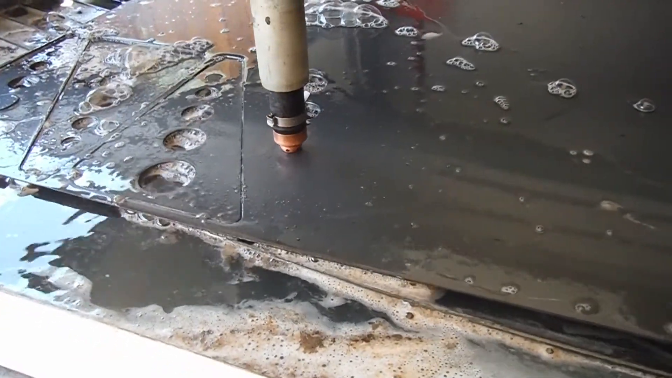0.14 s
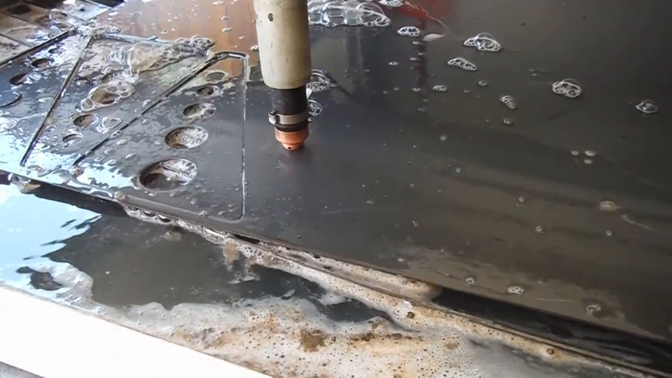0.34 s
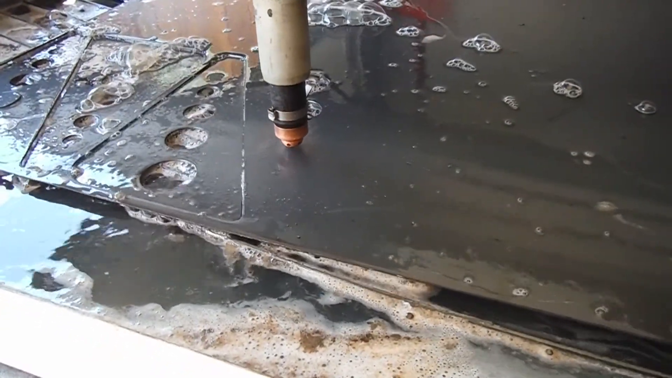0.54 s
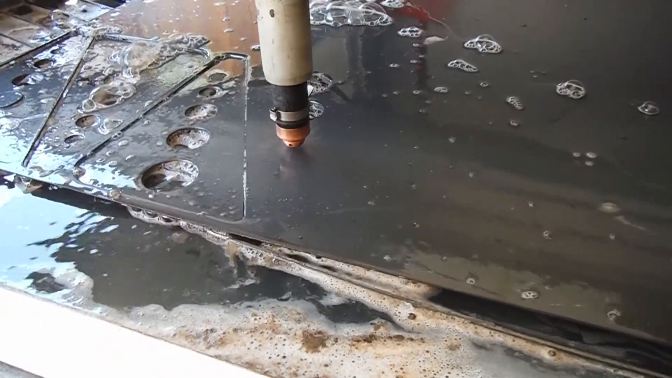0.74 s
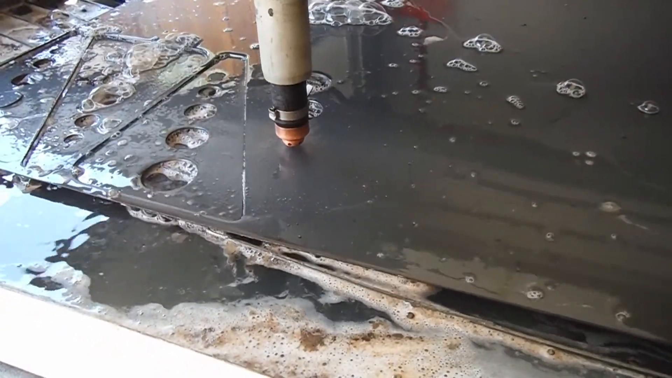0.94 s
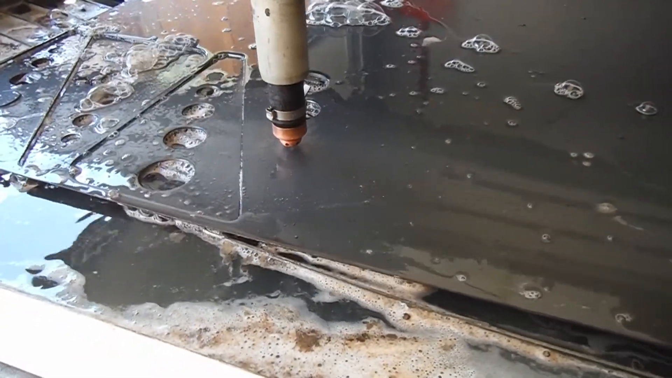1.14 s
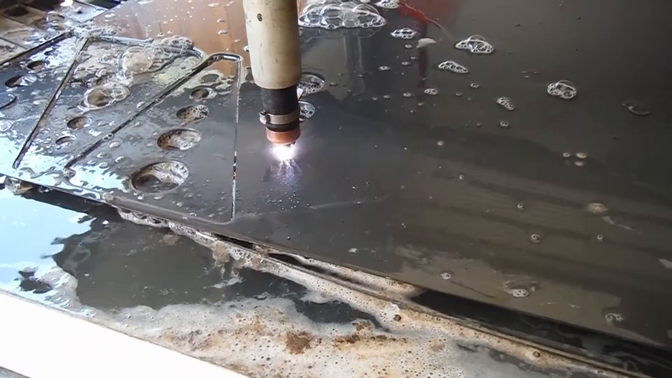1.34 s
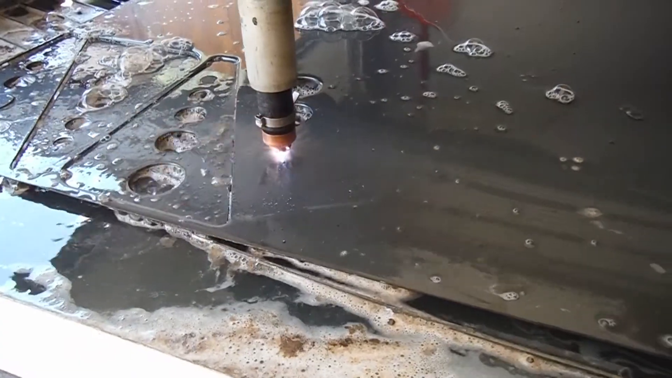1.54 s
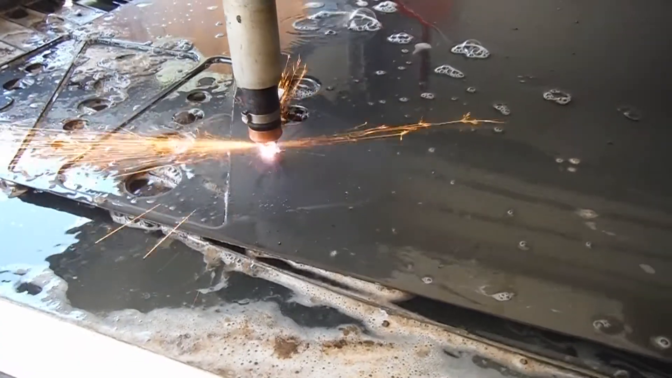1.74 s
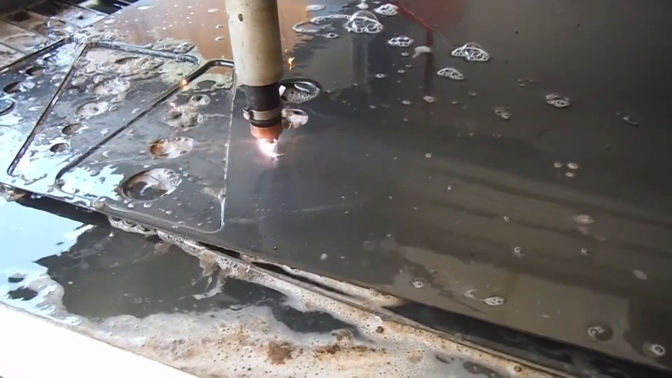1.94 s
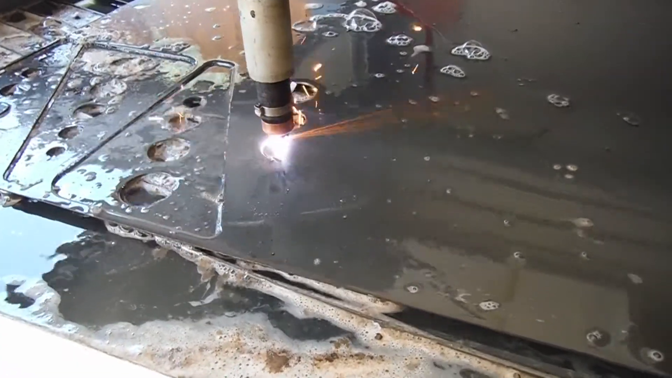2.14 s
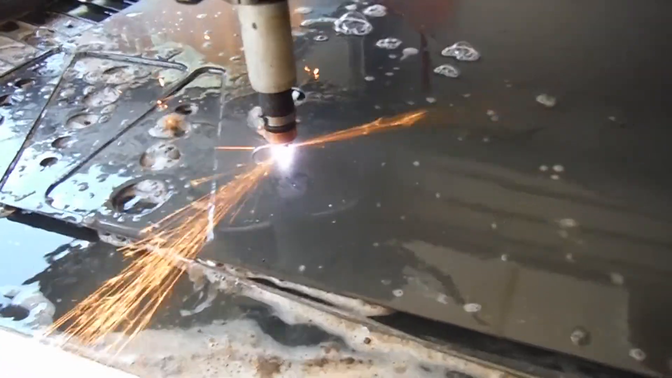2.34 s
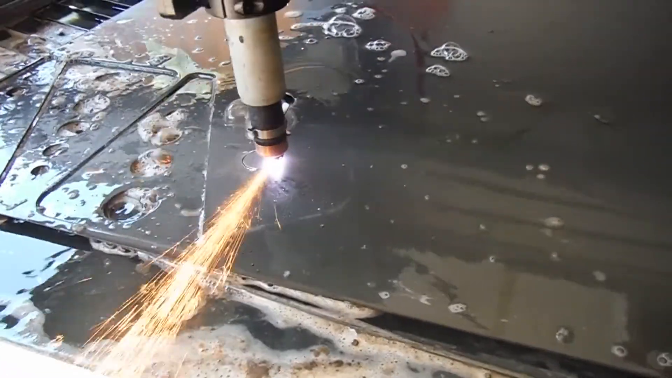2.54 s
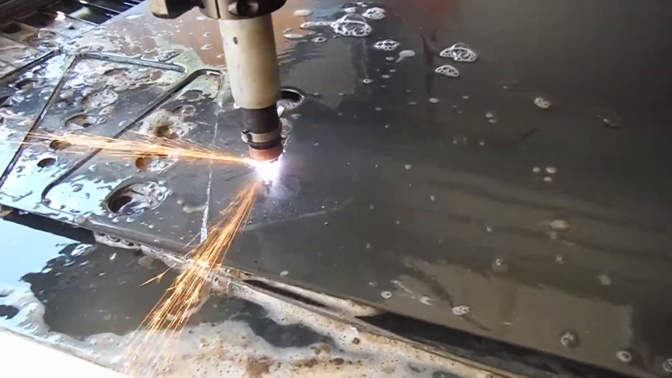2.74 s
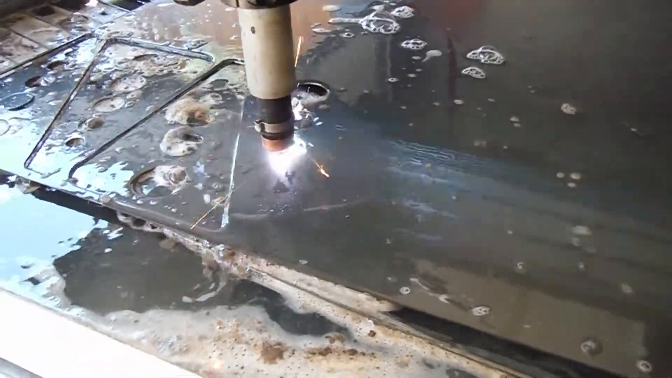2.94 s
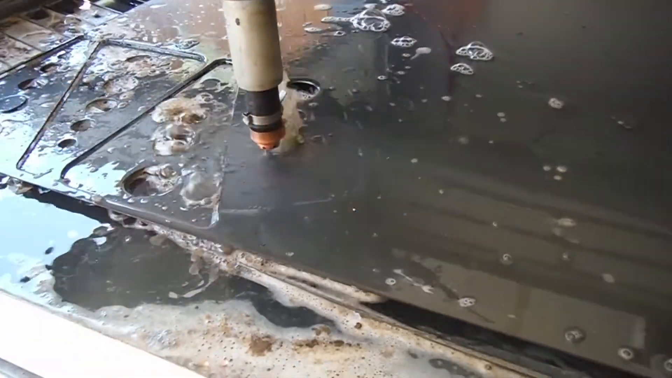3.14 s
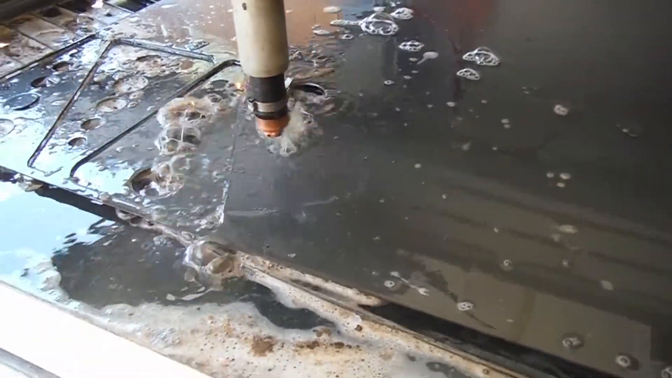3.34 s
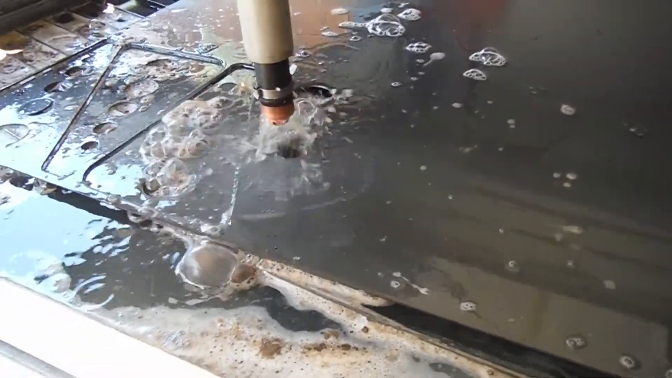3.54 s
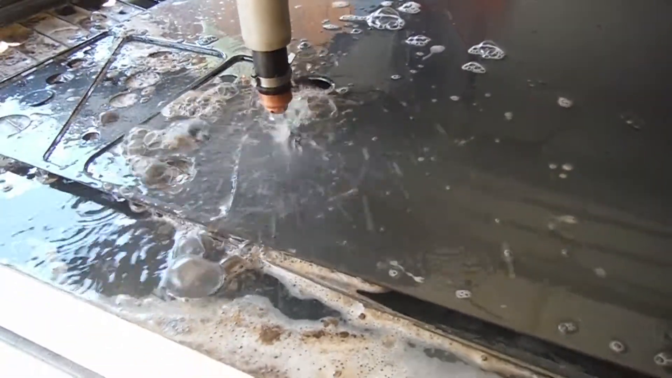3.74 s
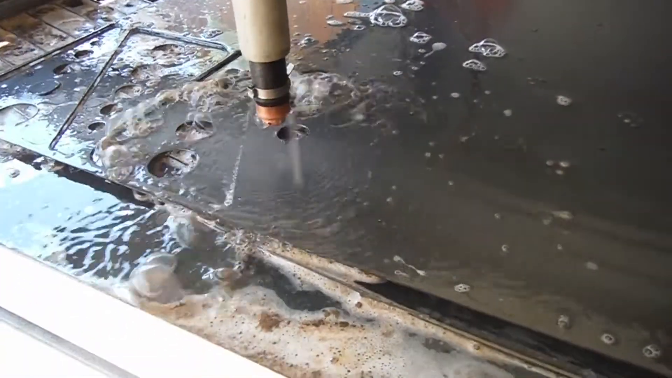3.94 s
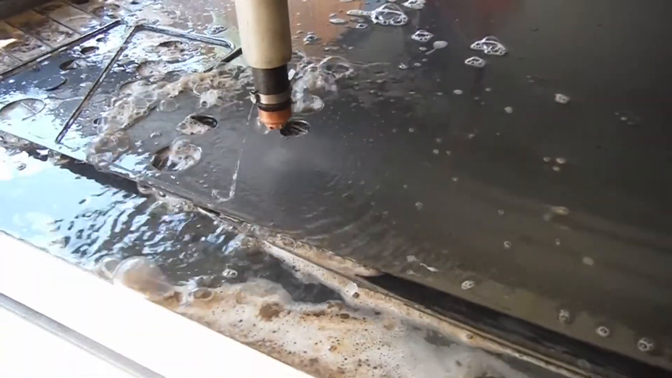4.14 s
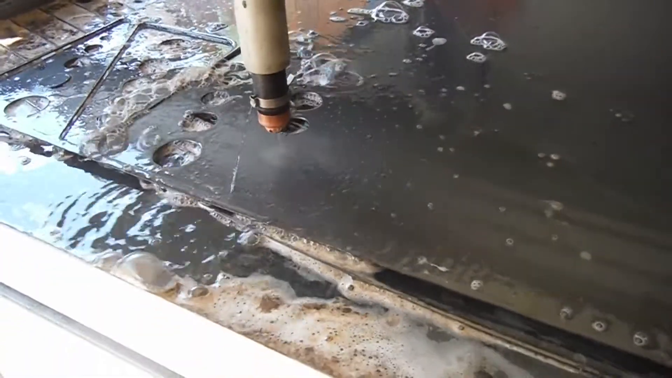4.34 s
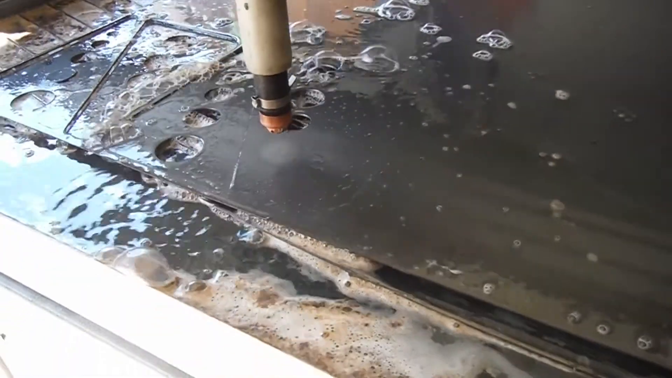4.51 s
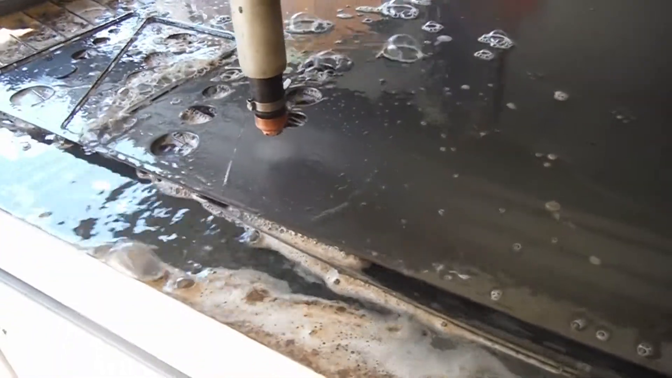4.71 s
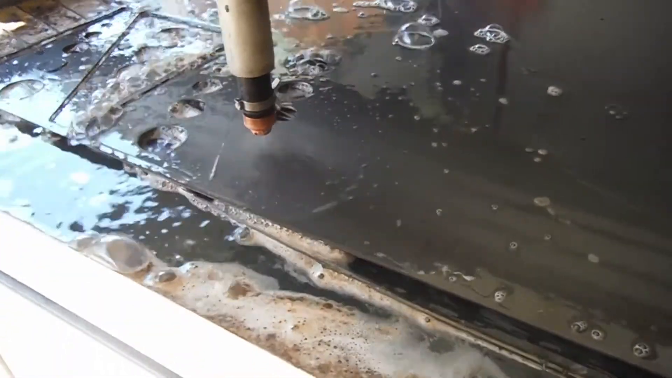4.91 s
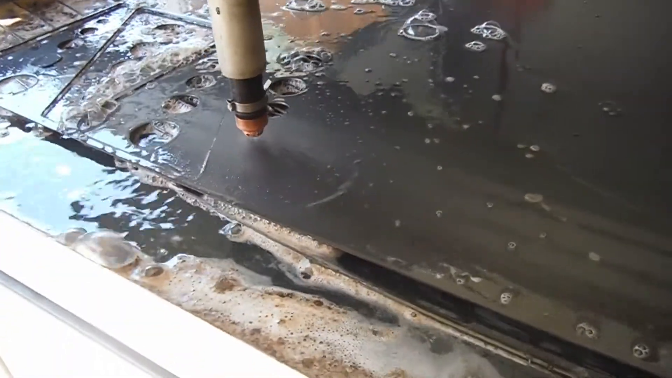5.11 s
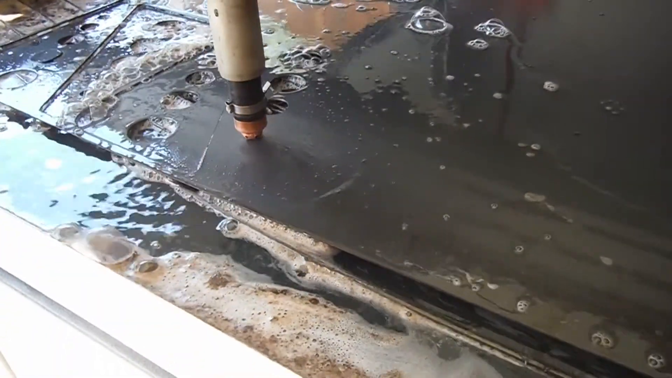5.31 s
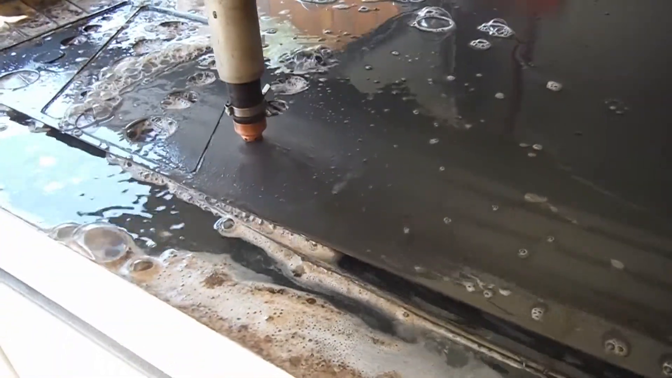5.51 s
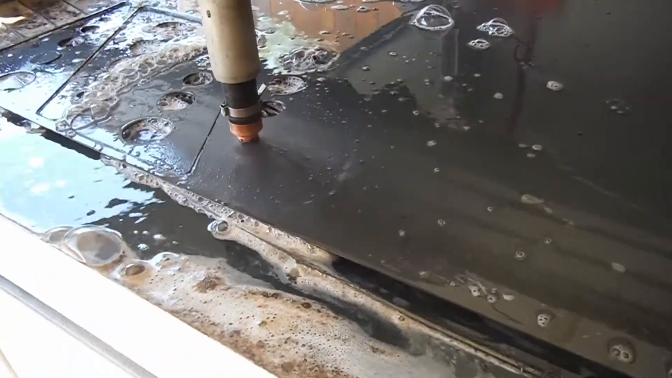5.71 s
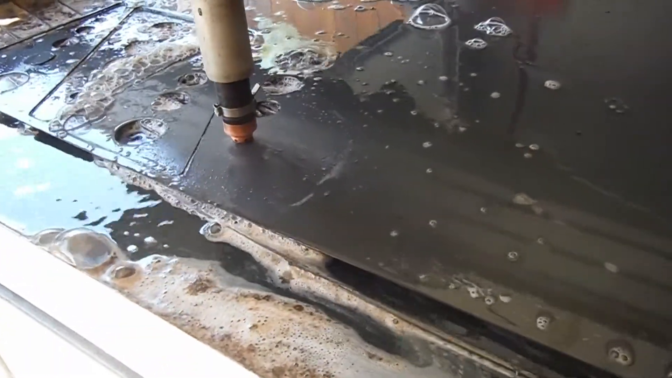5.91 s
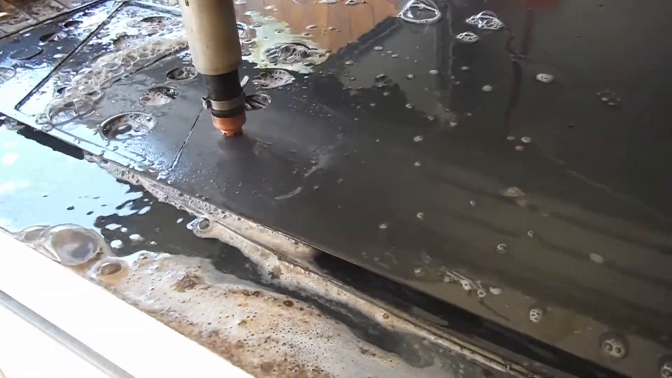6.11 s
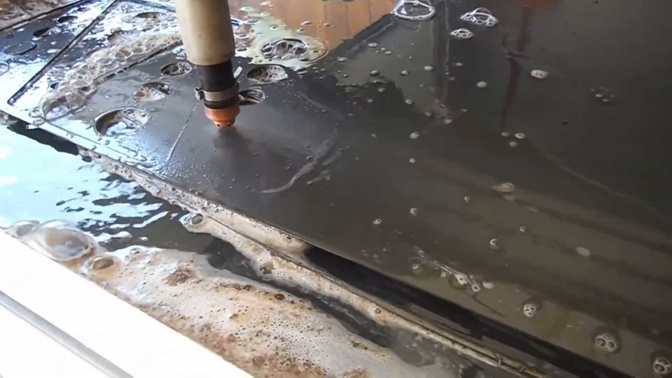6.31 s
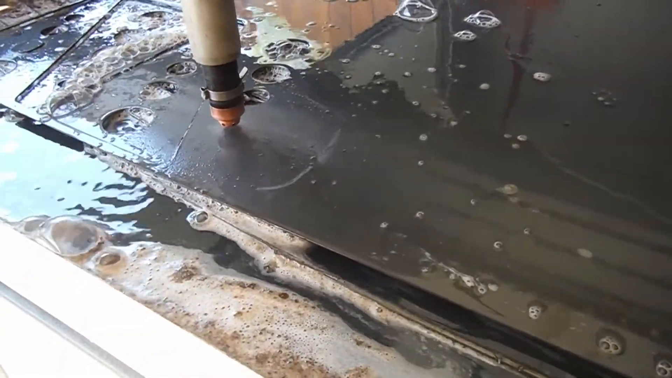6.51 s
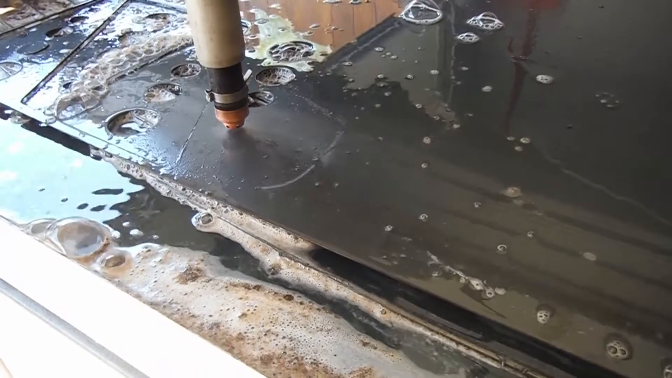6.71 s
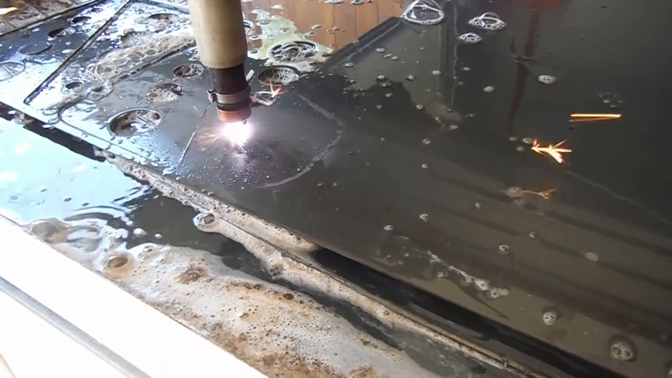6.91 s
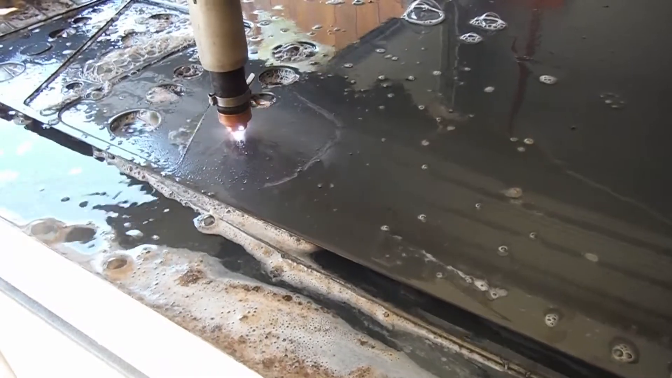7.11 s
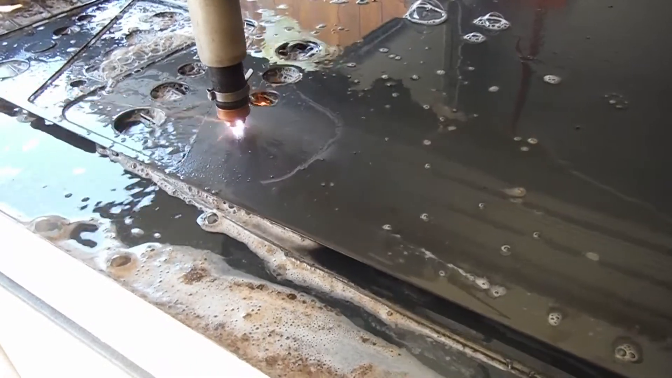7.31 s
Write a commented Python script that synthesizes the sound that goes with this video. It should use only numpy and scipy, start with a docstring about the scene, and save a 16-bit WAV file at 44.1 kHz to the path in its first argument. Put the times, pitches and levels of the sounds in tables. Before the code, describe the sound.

A harsh, bright air-jet hiss, very close and overloaded into hard clipping, runs steadily from the start. At about 0.75 s it drops away within a quarter second, baring faint workshop fans, hum and a thin motor whine. A sharp valve click at 1.17 s is followed at 1.2 s by the arc's pop; full hiss leaps back with a bright sizzle. Low burbles throb until 1.7 s, while a rough, puffing roar grows. Sizzling showers swell around 1.6-2.1 and 2.9 s, and wet, chirping spits ring from 2.2 s. The arc dies near 3.1 s; hiss carries on over churning bubbles and longer watery spits until about 3.9 s. Its tone drops, then climbs back, half whistling, through 5.5 s. It fades at 6.4 s to quiet motor whine. A click at 6.84 s and thumping strike at 6.87 s restart hiss, burble and sizzle to the end at about 7.4 s.

```python
"""A harsh, overloaded air-jet hiss close by: a plasma torch over sheet steel on a water table.
The hiss dies away twice and returns with a valve click and the pop of the arc striking.
Low burbles pierce the plate, shaped noise roars and sizzles in the cut, and ringing spits chirp in the water.
The jet is filtered noise whose colour shifts as the torch lifts; faint fans, hum and motors lie behind.
The summed sound is clipped hard and its top is cut."""
import sys
import numpy as np
from scipy import signal
from scipy.fft import rfft, irfft, next_fast_len
from scipy.io import wavfile

SR = 44100
rng = np.random.default_rng(int(sys.argv[2]) if len(sys.argv) > 2 else 0)


def to_wav(s):
    """Save 16-bit WAV."""
    ch = np.atleast_2d(s).T  # columns
    pcm = np.round(np.clip(ch, -1, 1) * 32767)  # PCM
    wavfile.write(sys.argv[1], SR, pcm.astype(np.int16))


N = 324576
WINDOW, HOP = 512, 256  # short-time spectrum, samples
TIME = np.arange(N) / SR
FRAMES = np.arange(-(-N // HOP) + 1) * HOP / SR  # s
BINS = np.maximum(np.arange(WINDOW // 2 + 1), .5)[:, None] * SR / WINDOW  # Hz


def from_db(db):
    """Amplitude of a level in dB."""
    return 10 ** (np.asarray(db) / 20)


def rms_one(x):
    """Scales a sound to rms 1."""
    return x / np.sqrt(np.mean(x ** 2) + 1e-20)


def columns(rows, times):
    """Each column of a curve, read at the given times."""
    s, *values = np.transpose(rows)
    return [np.interp(times, s, v) for v in values]


def at_hz(points, hz):
    """A spectrum read on a log-frequency axis."""
    point_hz, point_db = np.array(points).T
    return np.interp(np.log(hz), np.log(point_hz), point_db)


def drift(rate):
    """Smooth chance of spread 1 that changes about `rate` times a second."""
    # low-passed noise, drawn at every 20th sample
    r = np.exp(-40 * np.pi * rate / SR)
    noise = rng.standard_normal(N // 20 + 2002)
    slow = signal.lfilter([1], [1, -2 * r, r * r], noise)[2000:]
    return np.interp(np.arange(N) / 20, np.arange(len(slow)), rms_one(slow))


def turbulence(spectrum, flutter_db, flutter_rate):
    """Noise that comes in quick puffs, coloured by a spectrum; rms 1."""
    flutter = np.clip(drift(flutter_rate), -2.5, 2.5)
    puffs = rng.standard_normal(N) * from_db(flutter_db * flutter)
    size = next_fast_len(N)
    hz = np.maximum(np.arange(size // 2 + 1) * SR / size, 1)
    coloured = rfft(puffs, size) * from_db(at_hz(spectrum, hz))
    return rms_one(irfft(coloured, size)[:N])


def bell(centre_hz, octaves):
    """A bell on the log-frequency axis, one for each frame."""
    return np.exp(-.5 * (np.log2(BINS / centre_hz) / octaves) ** 2)


def gate(times, start, end, fade_s):
    """Rises from start, holds at 1, and has fallen again by end."""
    return np.clip(np.minimum(times - start, end - times) / fade_s, 0, 1)


def add(out, s, sound):
    """Mixes a sound in at time s."""
    start = round(s * SR)
    out[start:start + len(sound)] += sound[:N - start]


# colour of the jet; the low edge drops as the torch lifts:
# (time [s], low edge [Hz], boost of the 13 kHz hump [dB, before levelling])
TORCH_COLOUR = [(0, 3670, 2.5), (1.3, 3694, 0.5), (2.8, 3835, 3), (3.15, 3720, -1), (3.5, 3030, -5.5),
                (3.8, 2830, -4.5), (4.26, 3067, -2), (4.95, 3470, -3), (5.55, 4060, -0.5),
                (7.36, 3900, -1.5)]
RESTING_EDGE_HZ = 4000


def lift_of(times):
    """How far the torch is lifted, in octaves that the jet's low edge has dropped."""
    edge_hz = columns(TORCH_COLOUR, times)[0]
    return np.clip(np.log2(RESTING_EDGE_HZ / edge_hz), 0, None)


# the valve shuts and the hose empties, ever faster: (time [s])
VALVE_SHUTS = [0.76, 6.431]
# the air valve opens with a click before each cut: (time [s], click peak [dB])
VALVE_OPENS = [(1.167, -6), (6.839, -6)]
# the arc burns: (strike [s], out [s], thump [dB], ring [Hz], ring level [dB])
ARCS = [(1.2005, 3.12, -23, 2000, -17), (6.872, 7.5, -8.5, 1280, -9.5)]
EMPTY_S, EMPTY_DB, EMPTY_CURVE = .25, 30, 1.43  # the jet loses this much in this time
PREFLOW_DB, PREFLOW_DB_PER_S = -23.5, 300  # the air builds up between click and strike


def flow_db(times):
    """Air flow against full: dies when the valve shuts, builds after the click, leaps to full at the strike."""
    db = np.zeros(len(times))
    for shut, (opened, _), (strike, *_) in zip(VALVE_SHUTS, VALVE_OPENS, ARCS):
        shut_for = np.maximum(times - shut, 0)
        emptying = -np.minimum(EMPTY_DB * (shut_for / EMPTY_S) ** EMPTY_CURVE, 42)
        building = PREFLOW_DB + PREFLOW_DB_PER_S * (times - opened)
        db += np.where(times < opened, emptying, building) * (times < strike)
    return db


# fan noise spectrum: (frequency [Hz], relative density [dB])
SHOP_SPECTRUM = [(25, -13), (45, -12), (70, -2), (100, -11), (180, -9.5), (330, -7), (600, -17), (900, -13),
                 (1900, -22), (3500, -20), (6000, -32), (15000, -65)]
# hum of the workshop's machines: (frequency [Hz], mean level [dB])
HUM = [(66.5, -51.5), (83.3, -54.5), (121, -56.5), (167, -56), (247.5, -55)]
# drive motors lowering the torch: (start [s], end [s], frequency [Hz], level [dB])
MOTORS = [(.76, 1.184, 899, -54.5), (.85, 1.1, 1180, -58), (6.444, 6.88, 430, -53), (6.5, 6.87, 1140, -61),
          (6.55, 6.87, 1320, -61)]


def workshop(floor_db=-46.0, waver_db=2.5):
    """Broad fan noise, wavering sine hums and the short, slightly unsteady whine of the drive motors."""
    out = from_db(floor_db) * turbulence(SHOP_SPECTRUM, flutter_db=0.5, flutter_rate=7.4)
    # the root of two turns an rms level into a sine's peak
    for hz, level_db in HUM:
        level = np.sqrt(2) * from_db(level_db + waver_db * drift(7.1))
        out += level * np.sin(2 * np.pi * (hz * TIME + rng.random()))
    for start, end, hz, level_db in MOTORS:
        running = gate(TIME, start, end, fade_s=.034)
        whine = np.sin(2 * np.pi * hz * TIME + 0.34 * drift(17))
        out += np.sqrt(2) * from_db(level_db) * running * whine
    return out


CLICK_HZ, CLICK_RING_S, CLICK_BODY_DB = 7400, .00035, -3  # the valve's ring and the dull knock under it


def ignition(click_s=0.0004, thump_hz=62, thump_s=0.0059, ring_s=.011, crack_db=-11.5, crack_s=0.013):
    """The valve clicks; then the arc strikes, and the suddenly heated air thumps and rings under the torch."""
    out, t = np.zeros(N), TIME[:SR // 8]
    for s, peak_db in VALVE_OPENS:
        knock = rng.standard_normal(len(t)) * np.exp(-t / click_s)
        knock = signal.sosfilt(signal.butter(1, [600, 6000], "band", fs=SR, output="sos"), knock)
        click = np.sin(2 * np.pi * CLICK_HZ * t) * np.exp(-t / CLICK_RING_S)
        click = click + from_db(CLICK_BODY_DB) * knock / np.abs(knock).max()
        add(out, s, from_db(peak_db) * click / np.abs(click).max())
    for s, _, thump_db, ring_hz, ring_db in ARCS:
        thump = -from_db(thump_db) * np.cos(2 * np.pi * thump_hz * t) * np.exp(-t / thump_s)
        ring = from_db(ring_db) * np.sin(2 * np.pi * ring_hz * t) * np.exp(-t / ring_s)
        crack = from_db(crack_db) * rng.standard_normal(len(t)) * np.exp(-t / crack_s)
        add(out, s, thump + ring + crack)
    return out


# burble spectrum: (frequency [Hz], relative density [dB])
BURBLE_SPECTRUM = [(60, -21), (150, -9.5), (240, 0), (320, 0), (480, -4.5), (900, -18.5), (2500, -39)]
# gas bursts through into the water, swells and sinks: (start [s], swell [s], end [s], peak level [dB])
PIERCES = [(1.277, .1, 1.72, -20.5), (6.959, .04, 7.43, -19)]
PIERCE_SINK_DB_PER_S, PIERCE_RELEASE_S = 16, .14


def pierces(throb_db=1.3, throb_rate=14):
    """Large bubbles throb under the plate while the arc bores through."""
    level = np.zeros(N)
    for start, swell_s, end, peak_db in PIERCES:
        age = np.maximum(TIME - start, 0)
        sunk_db = PIERCE_SINK_DB_PER_S * np.maximum(age - swell_s, 0)
        swell = np.minimum(age / swell_s, 1)
        release = np.clip((end - TIME) / PIERCE_RELEASE_S, 0, 1)
        level += from_db(peak_db - sunk_db) * swell * release
    throb = from_db(throb_db * drift(throb_rate))
    return level * throb * turbulence(BURBLE_SPECTRUM, flutter_db=1.5, flutter_rate=78)


SMALL_SPITS_PER_S, SMALL_SPIT_S, SMALL_SPIT_HZ = 14, .07, 1200
SMALL_SPIT_DB = -31  # mean, before the gain in spits()
SPITTING_START_S, SPITTING_END_S = 2.15, 3.7  # while the jet reaches the water


def small_spits(spread_octaves=.33, glide_octaves=0.252, spread_db=2.0):
    """Weak spits at random while the jet reaches the water, as rows like those of the loud ones."""
    rows = []
    for k, (jitter, pitch, glide, size) in enumerate(rng.standard_normal((60, 4))):
        s = SPITTING_START_S + (k + .3 * jitter) / SMALL_SPITS_PER_S
        hz = SMALL_SPIT_HZ * 2 ** (spread_octaves * np.clip(pitch, -2, 2))
        end_hz = hz * 2 ** (glide_octaves * glide)
        if s < SPITTING_END_S:
            rows.append((s, SMALL_SPIT_S, hz, end_hz, SMALL_SPIT_DB + spread_db * size))
    return rows


# loud spits of water:
# (time [s], length [s], start pitch [Hz], end pitch [Hz], level before gain and swell [dB])
LOUD_SPITS = [(1.295, .035, 900, 1200, -21), (1.346, .022, 1144, 1130, -22), (2.205, .05, 1200, 1800, -16),
              (2.268, .069, 1170, 1602, -11), (2.366, .057, 1150, 1380, -19.5),
              (2.41, 0.037, 960, 803, -16.5), (2.45, .084, 1000, 1160, -24),
              (2.505, 0.091, 3500, 1850, -18), (2.8, .11, 1300, 1707, -23), (2.924, 0.047, 750, 870, -13.5),
              (2.963, 0.078, 1040, 1105, -19), (3.004, 0.038, 910, 800, -15),
              (3.46, .27, 1290, 1060, -20.5), (3.57, .25, 2100, 2170, -19.5), (3.66, .15, 1420, 1658, -25),
              (3.89, .07, 1280, 820, -32), (6.965, .035, 920, 750, -26), (7.239, .058, 330, 460, -21),
              (7.33, .054, 1300, 1680, -20)]
# spray thrown by a spit: (frequency [Hz], relative density [dB])
SPRAY_SPECTRUM = [(200, -25), (500, -9), (1200, -5), (2100, 0), (3200, -3.5), (4500, -1.5), (7000, -22),
                  (15000, -50)]


def spits(width_share=0.17, grain_db=4.0, swelling=1.5, rise=0.66, settle=.65, gain_db=2.5,
          splutter_db=2.0, spray_db=-5.5):
    """Bursts of spray ring in a pocket of air whose size, and so pitch, changes fast and then settles."""
    out, thrown = np.zeros(N), np.zeros(N)
    spray = turbulence(SPRAY_SPECTRUM, flutter_db=4.5, flutter_rate=180)
    for s, length, start_hz, end_hz, level_db in LOUD_SPITS + small_spits():
        u = np.linspace(0, 1, int(length * SR))
        real, imaginary, sizes = rng.standard_normal((3, SR // 2))[:, :len(u)]
        grains = (real + 1j * imaginary) * from_db(grain_db * sizes)
        # a steadily swelling pocket falls in pitch and rings more clearly
        width_hz = width_share * start_hz * min(end_hz / start_hz, 1) ** swelling
        r = np.exp(-np.pi * width_hz / SR)
        pocket = signal.lfilter([1], [1, -r], grains)
        pocket = signal.sosfilt(signal.butter(2, start_hz, fs=SR, output="sos"), pocket)
        # shift the narrow noise up to the gliding pitch
        pitch_hz = start_hz * (end_hz / start_hz) ** (u ** settle)
        phase = 2 * np.pi * np.cumsum(pitch_hz) / SR
        swell = from_db(level_db + gain_db) * np.abs(np.sin(np.pi * u ** rise))
        add(out, s, swell * rms_one(np.real(pocket * np.exp(1j * phase))))
        add(thrown, s, swell)
    return from_db(splutter_db * drift(70)) * (out + from_db(spray_db) * thrown * spray)


def small_bubbles(per_s=500, spread_db=3.0, cycles=3.4, count=18):
    """Small bubbles burst at random, each ringing a few cycles at one of `count` pitches; rms 1."""
    born = rng.random(N) < per_s / SR
    strength = from_db(spread_db * np.minimum(rng.exponential(1, N), 3))
    sizes = born * rng.choice([-1, 1], N) * strength
    dealt, out = rng.integers(0, count, N), np.zeros(N)
    for k, hz in enumerate(np.geomspace(520, 3400, count)):
        r, w = np.exp(-hz / (cycles * SR)), 2 * np.pi * hz / SR
        out += signal.lfilter([np.sin(w)], [1, -2 * r * np.cos(w), r * r], sizes * (dealt == k) + 1e-18)
    return rms_one(out)


def arc_ages():
    """For each arc: seconds since its strike, and how fully it burns (0 to 1)."""
    for strike, out, *_ in ARCS:
        burning = (TIME > strike) * np.clip((out - TIME) / ARC_FADE_S, 0, 1)
        yield np.maximum(TIME - strike, 0), burning


# roar spectrum: (frequency [Hz], relative density [dB])
ROAR_SPECTRUM = [(30, -36), (100, -12), (170, -1), (300, 0.5), (620, -4.5), (1000, 5.5), (2000, 4.5),
                 (3200, 8), (5000, -17), (10000, -52.5)]
ARC_FADE_S = .1  # the roar dies as the arc goes out
# roar levels in dB, before the gain in kerf_roar(); the roar grows while the arc bores through
STRIKE_ROAR_DB, CUTTING_ROAR_DB, BORE_S = -28.5, -20, 0.64
AIR_ROAR_DB, AIR_ROAR_REACH = -33.5, .2  # air alone on the plate; fades over this lift (octaves)
PLATE_CLEAR_S = 3.8  # the water is blown away
CHURN_START_S, CHURN_DB = 3.01, -24  # the after-flow churns the water in the fresh hole


def kerf_roar(bubbles_db=-9.5, roar_gain_db=-1.9):
    """Air tearing through the kerf roars in puffs and churns the water into small bubbles."""
    level = from_db(AIR_ROAR_DB + flow_db(TIME)) * np.exp(-(lift_of(TIME) / AIR_ROAR_REACH) ** 2)
    churning = gate(TIME, CHURN_START_S, PLATE_CLEAR_S + 0.11, fade_s=0.21)
    level = np.hypot(level, from_db(CHURN_DB) * churning)
    for age, burning in arc_ages():
        boring_db = np.interp(age, [0, BORE_S], [STRIKE_ROAR_DB, CUTTING_ROAR_DB])
        level = np.hypot(level, burning * from_db(boring_db))
    churn = from_db(roar_gain_db) * turbulence(ROAR_SPECTRUM, flutter_db=2.5, flutter_rate=270)
    churn = churn + from_db(bubbles_db) * small_bubbles()
    return level * from_db(1.4 * drift(13.0)) * churn


# sizzle spectrum: (frequency [Hz], relative density [dB])
SIZZLE_SPECTRUM = [(3000, -25), (8000, -4), (9500, -1), (10800, 0), (12500, -5), (15500, -15)]
# showers of sparks or spray: (start [s], end [s], sizzle level [dB])
SHOWERS = [(1.61, 2.1, -6.5), (2.878, 3.05, -9), (3.17, 3.6, -15.5), (7.24, 7.5, -10)]
FLASH_DB, FLASH_S, ARC_SIZZLE_DB = -7.5, 0.14, -17.5  # the wet plate sizzles at the strike, then less


def melt_sizzle():
    """Melt and spray sizzle as bright, fluttering noise: a flash at each strike, then cutting and showers."""
    level = np.zeros(N)
    for age, burning in arc_ages():
        flash = from_db(FLASH_DB) * np.exp(-(age / FLASH_S) ** 2)
        level += burning * (flash + from_db(ARC_SIZZLE_DB) * np.minimum(age / BORE_S, 1))
    for start, end, level_db in SHOWERS:
        level = np.hypot(level, from_db(level_db) * gate(TIME, start, end, fade_s=0.097))
    return level * turbulence(SIZZLE_SPECTRUM, flutter_db=3.5, flutter_rate=150)


# hiss spectrum above the low edge: (frequency [Hz], relative density [dB])
JET_SPECTRUM = [(4200, -11), (4900, -9), (5400, -5), (6100, -1.5), (7000, 0), (7900, 0), (8700, -1.5),
                (9300, -6), (10000, -10), (10700, -11), (12000, -9), (13000, -8), (14200, -12),
                (15400, -18)]
# strength of the jet at full flow: (time [s], level [dB])
JET_LEVEL = [(0, -6.5), (.76, -7.3), (1.45, -7), (1.8, -3.5), (2.5, -6), (3.6, -5), (4, -7.5), (5.1, -8),
             (5.6, -6.7), (6.9, -8), (7.36, -6.3)]
# resonances of the gap under the lifted torch: (frequency [Hz], boost [dB per octave that the edge drops])
GAP_MODES = [(4300, 10), (4950, 5), (9900, 9), (11900, 6.5)]
# the jet half whistles over the edges of the cut:
# (start [s], end [s], start pitch [Hz], end pitch [Hz], boost [dB, before levelling])
WHISTLES = [(0, 1.0, 6240, 6100, 2.2), (1.55, 3.05, 8100, 7600, 3), (3.85, 4.25, 6100, 6100, 6.5),
            (4.13, 5.15, 8100, 9150, 4)]
# the cleared plate's reflection carves a dip that climbs as the torch comes down
RESTING_DIP_HZ, DIP_CLIMB, DIP_DB_PER_OCTAVE = 9290, 1.74, 21


def air_jet(skirt_db=-18.0, skirt_slope_db=5.0, edge_octaves=0.051, echo_db=0.2, echo_spacing=0.436,
            wall_db=1.3, wall_spacing=.11, dulling=.7, flutter_db=0.63):
    """Nozzle hiss; its reflections carve a dip and ripples that move with the torch."""
    edge_hz, hump_db = columns(TORCH_COLOUR, FRAMES)
    lift = lift_of(FRAMES)
    above_edge = .5 + .5 * np.tanh(np.log2(BINS / edge_hz) / edge_octaves)
    skirt = skirt_db + skirt_slope_db * np.log2(np.maximum(BINS, 600) / edge_hz)
    colour = above_edge * at_hz(JET_SPECTRUM, BINS) + (1 - above_edge) * skirt
    colour = colour + hump_db * bell(13100, octaves=0.13)
    dip_hz = RESTING_DIP_HZ * (edge_hz / RESTING_EDGE_HZ) ** DIP_CLIMB
    clear = gate(FRAMES, PLATE_CLEAR_S, np.inf, fade_s=0.036)
    colour = colour - clear * lift * DIP_DB_PER_OCTAVE * bell(dip_hz, octaves=0.11)
    for start, end, start_hz, end_hz, height_db in WHISTLES:
        whistle_hz = np.interp(FRAMES, [start, end], [start_hz, end_hz])
        sounding = gate(FRAMES, start, end, fade_s=0.14)
        colour = colour + height_db * sounding * bell(whistle_hz, octaves=0.072)
    # lifting the torch lowers the edge and lets the gap under it resonate
    for hz, db_per_octave in GAP_MODES:
        colour = colour + lift * db_per_octave * bell(hz, octaves=0.1)
    # a dying jet is slower, so it loses its top first
    lost_db = np.maximum(-8 - flow_db(FRAMES), 0)
    colour = colour - dulling * lost_db * np.log2(np.maximum(BINS / 9500, 1))
    # the near plate gives wide ripples, the farther gantry narrow ones
    colour = colour + echo_db * np.cos(2 * np.pi * BINS / (echo_spacing * edge_hz))
    colour = colour + wall_db * np.cos(2 * np.pi * BINS / (wall_spacing * edge_hz))
    # level every frame, so that colour leaves the strength alone
    gain = from_db(colour)
    gain /= np.sqrt(np.mean(gain ** 2, axis=0))
    white = signal.stft(rng.standard_normal(N), nperseg=WINDOW)[2]
    hiss = signal.istft(white * gain, nperseg=WINDOW)[1][:N]
    level_db, = columns(JET_LEVEL, TIME)
    return hiss * from_db(level_db + flow_db(TIME) + flutter_db * drift(21))


def scene():
    """Background to main source, summed; one microphone feeds both channels."""
    background = workshop() + ignition()
    cutting = pierces() + spits() + kerf_roar() + melt_sizzle()
    return np.tile(background + cutting + air_jet(), (2, 1))


CUTOFF_HZ = 15850


def record(dry):
    """The hiss overloads the input, which clips hard; then the top is cut."""
    clipped = np.clip(dry, -.63, .63)
    low_pass = signal.firwin(401, CUTOFF_HZ, fs=SR)
    return signal.fftconvolve(clipped, low_pass[None], mode="same", axes=1)


dry = scene()
out = record(dry)
to_wav(out)
```